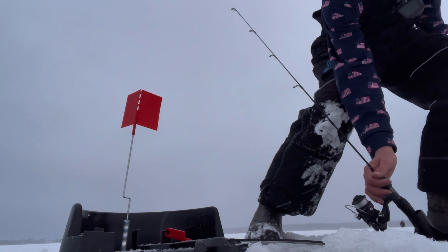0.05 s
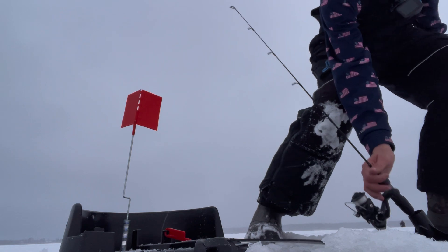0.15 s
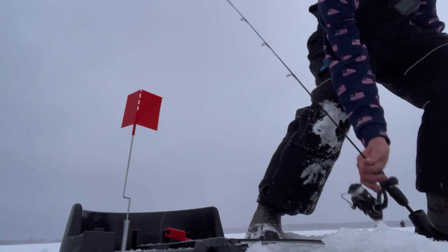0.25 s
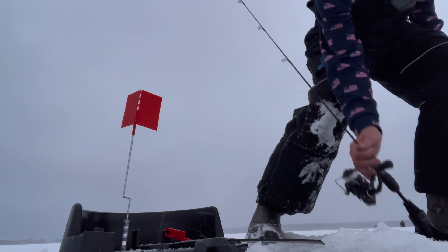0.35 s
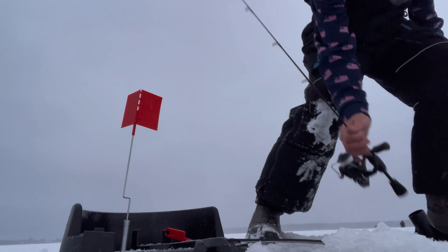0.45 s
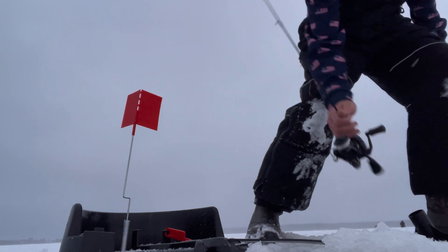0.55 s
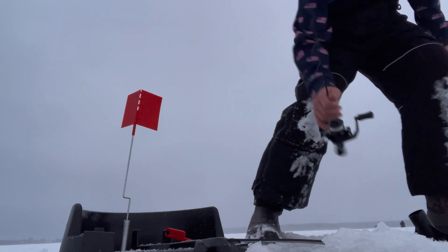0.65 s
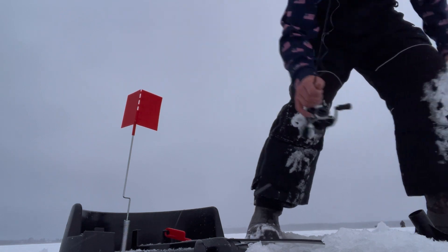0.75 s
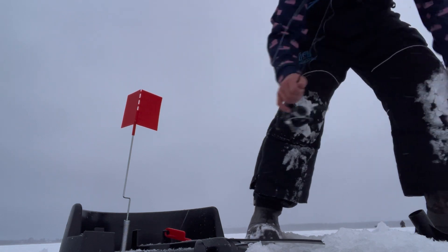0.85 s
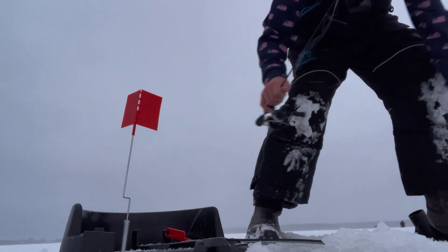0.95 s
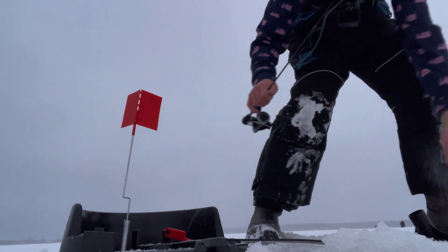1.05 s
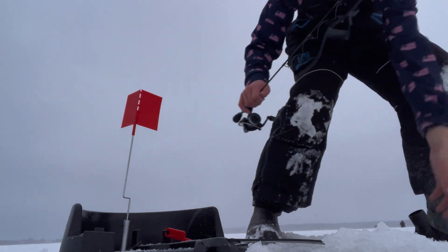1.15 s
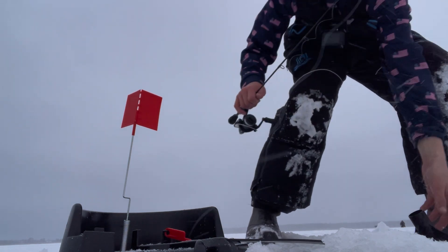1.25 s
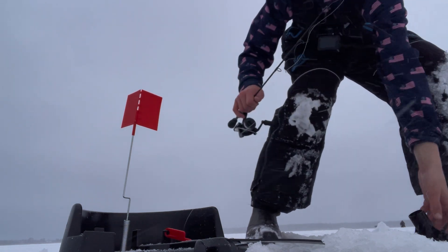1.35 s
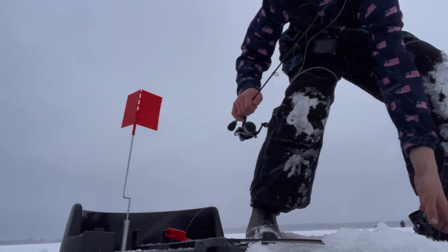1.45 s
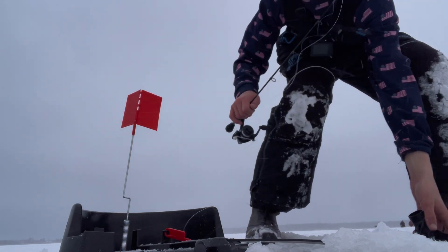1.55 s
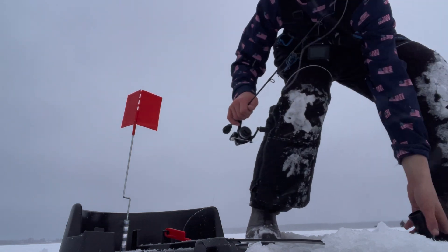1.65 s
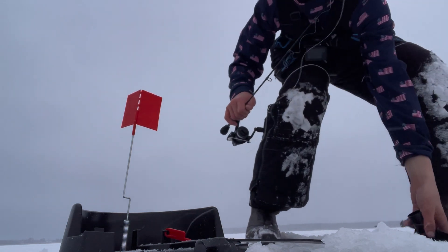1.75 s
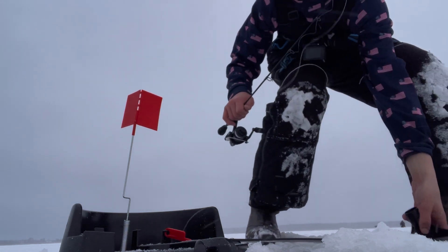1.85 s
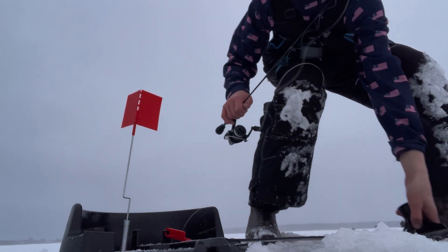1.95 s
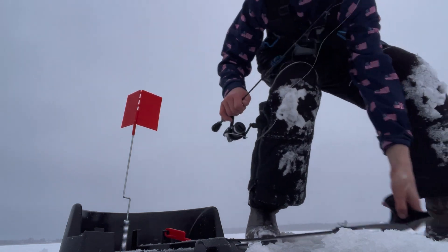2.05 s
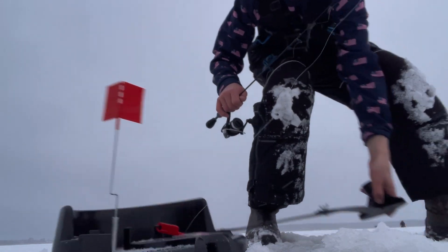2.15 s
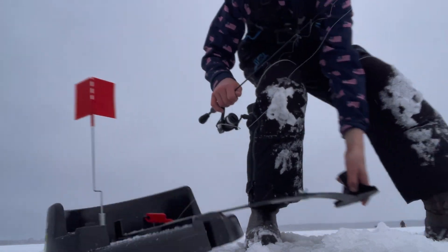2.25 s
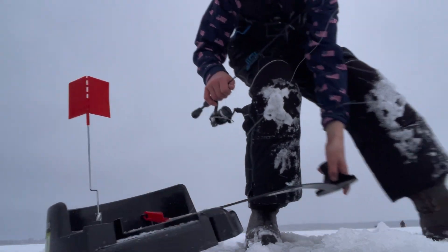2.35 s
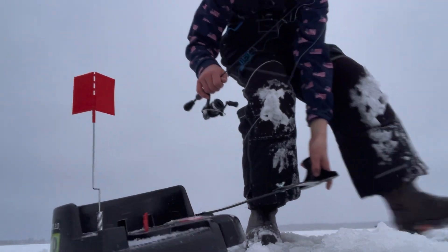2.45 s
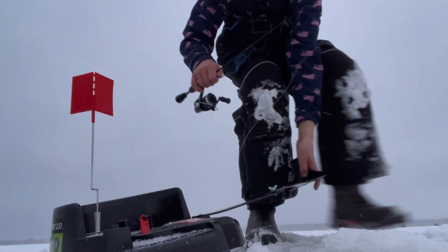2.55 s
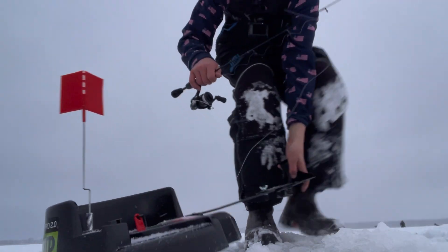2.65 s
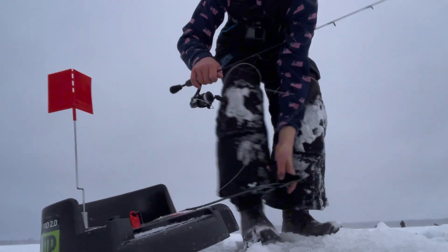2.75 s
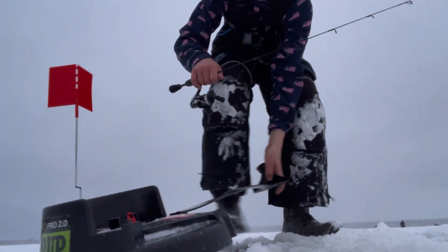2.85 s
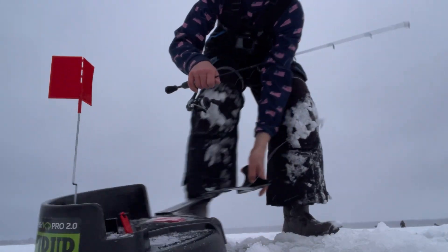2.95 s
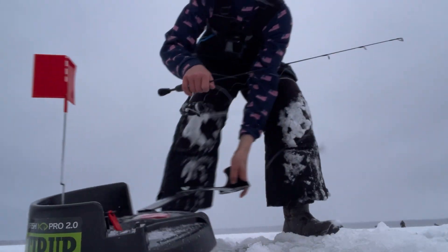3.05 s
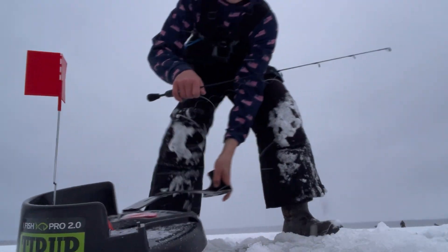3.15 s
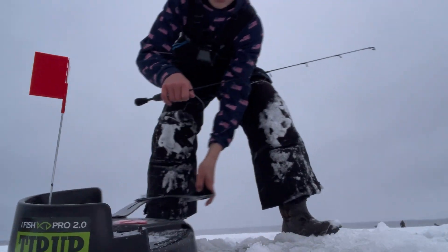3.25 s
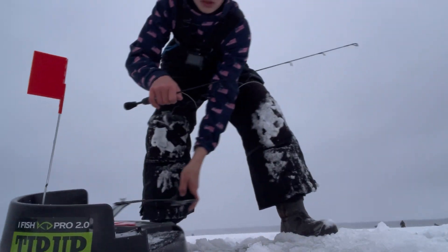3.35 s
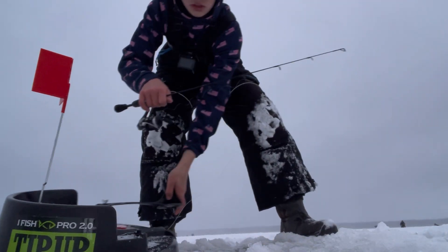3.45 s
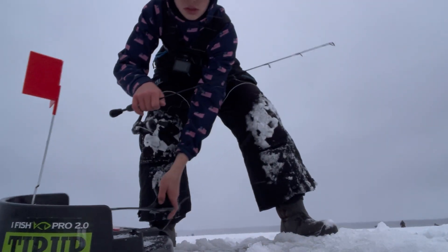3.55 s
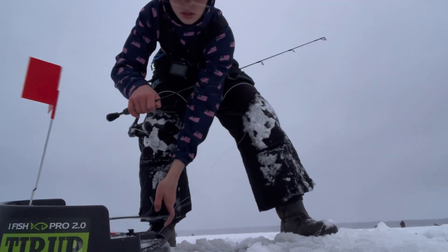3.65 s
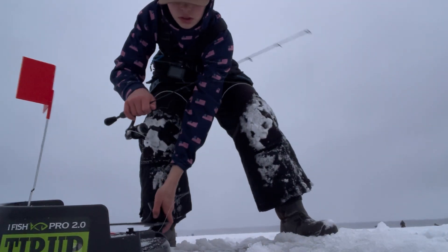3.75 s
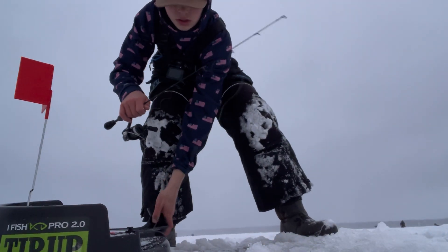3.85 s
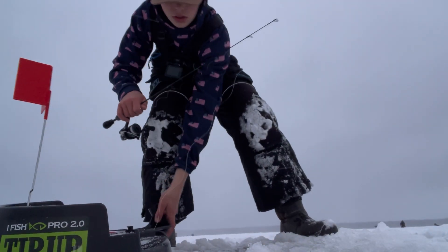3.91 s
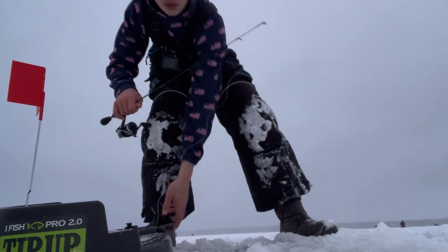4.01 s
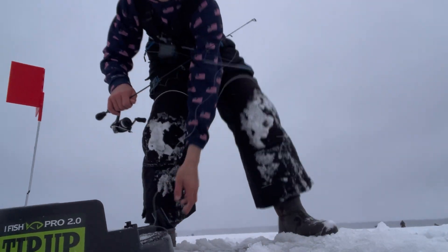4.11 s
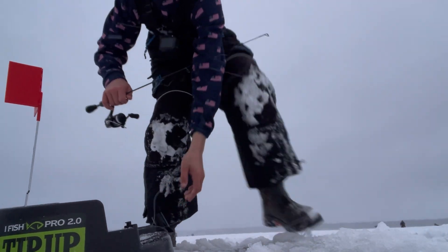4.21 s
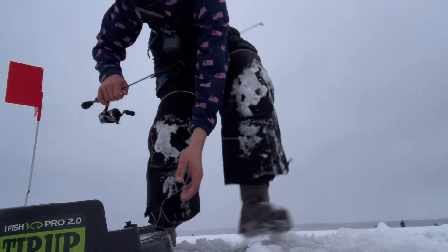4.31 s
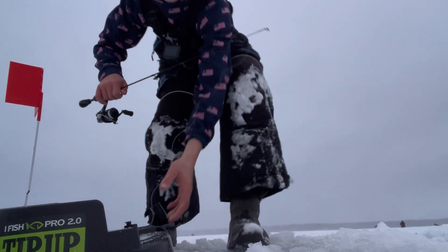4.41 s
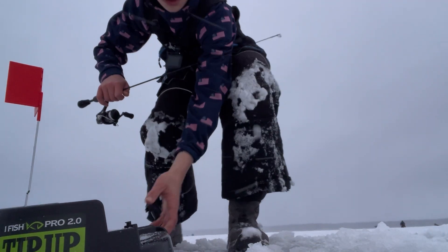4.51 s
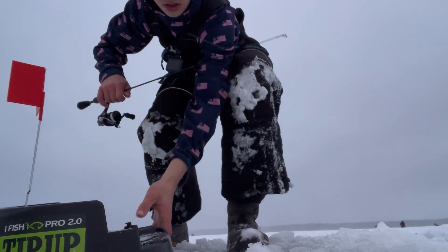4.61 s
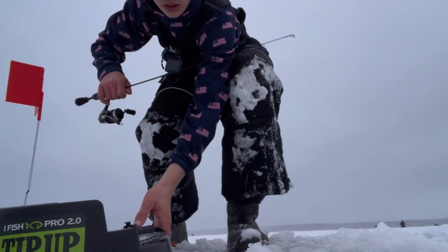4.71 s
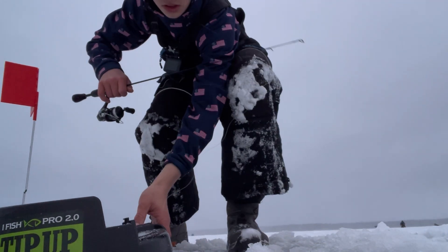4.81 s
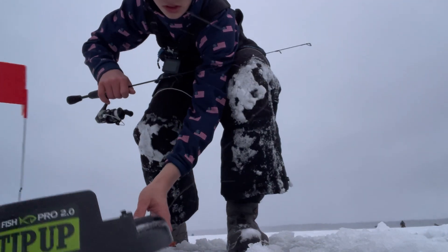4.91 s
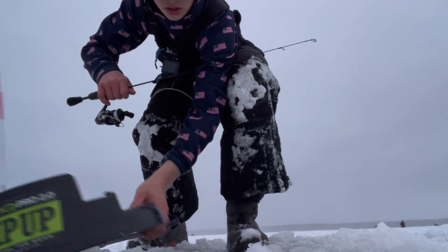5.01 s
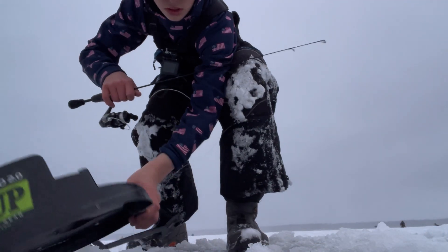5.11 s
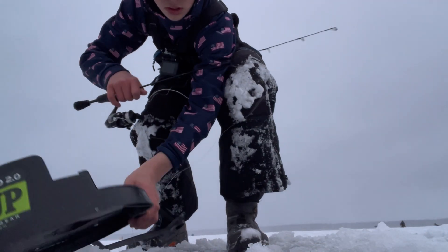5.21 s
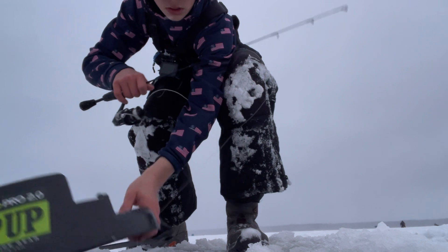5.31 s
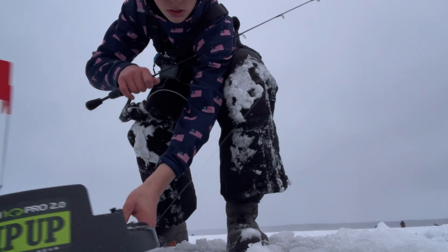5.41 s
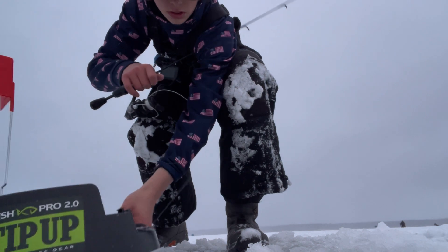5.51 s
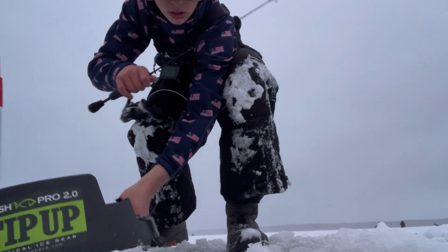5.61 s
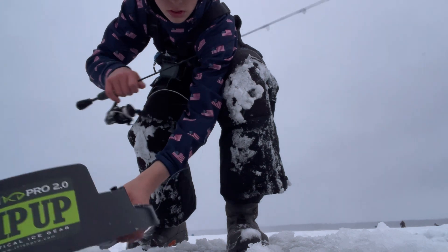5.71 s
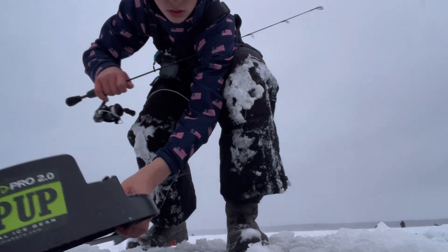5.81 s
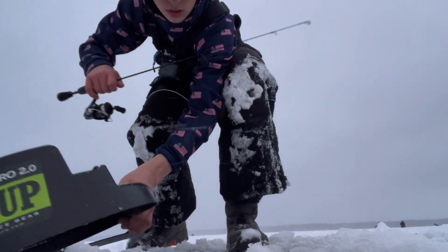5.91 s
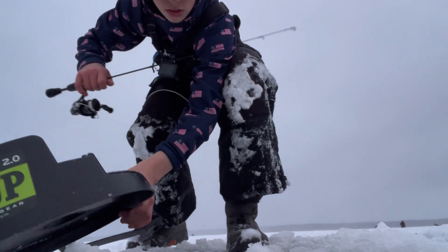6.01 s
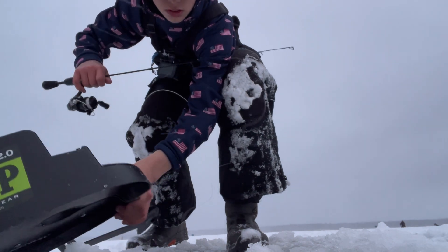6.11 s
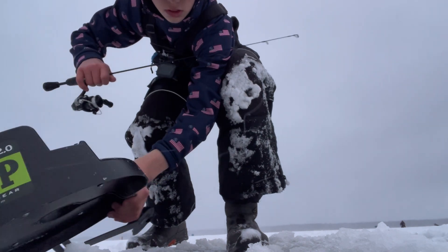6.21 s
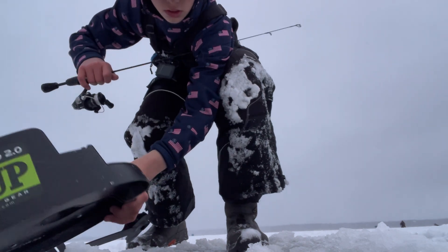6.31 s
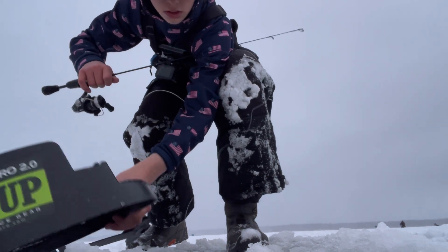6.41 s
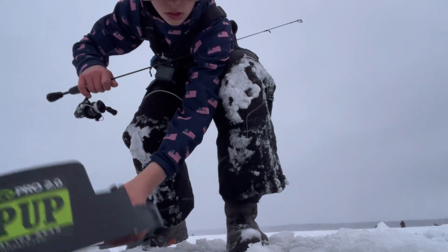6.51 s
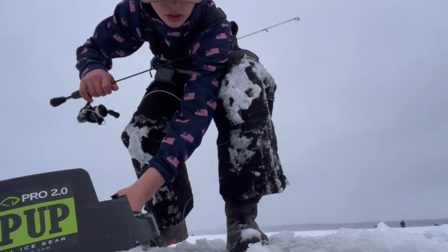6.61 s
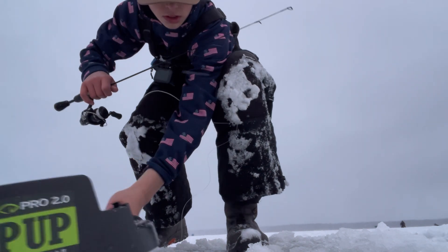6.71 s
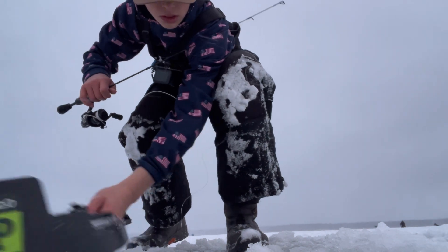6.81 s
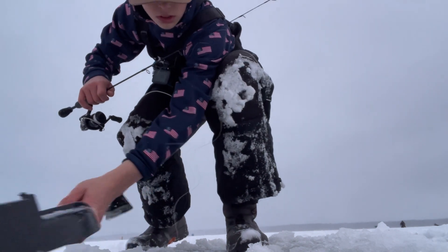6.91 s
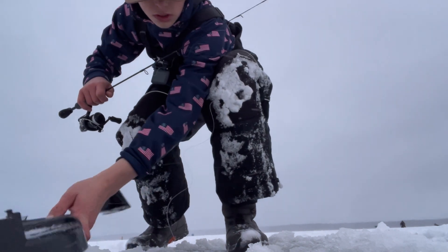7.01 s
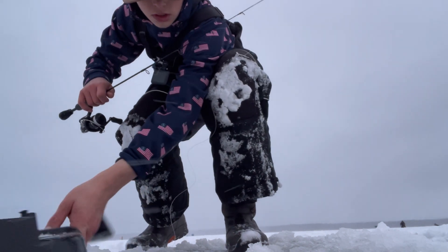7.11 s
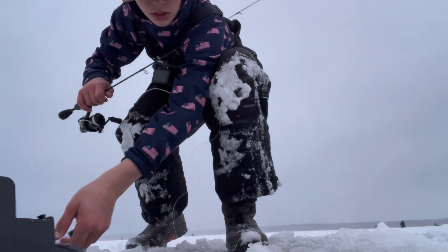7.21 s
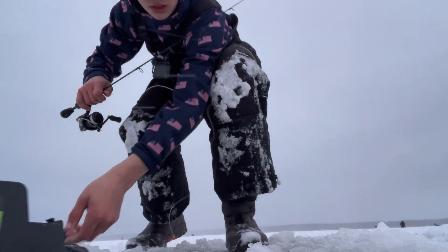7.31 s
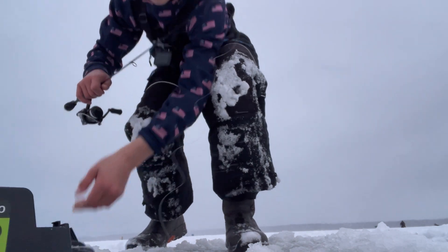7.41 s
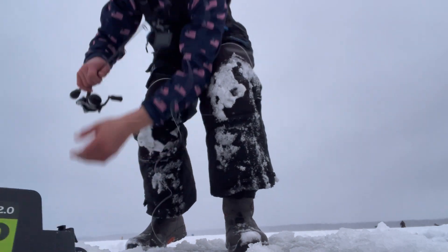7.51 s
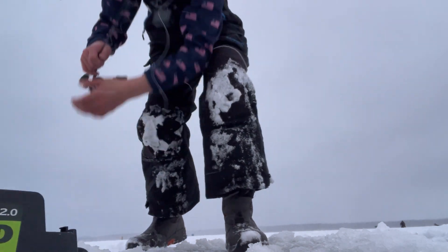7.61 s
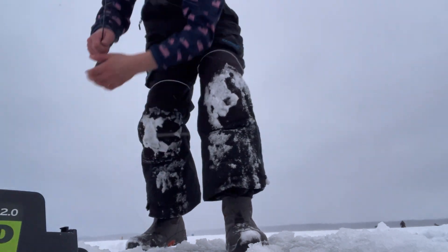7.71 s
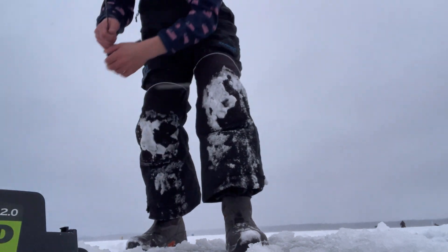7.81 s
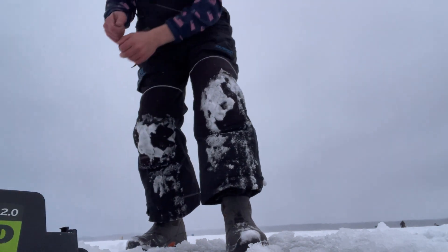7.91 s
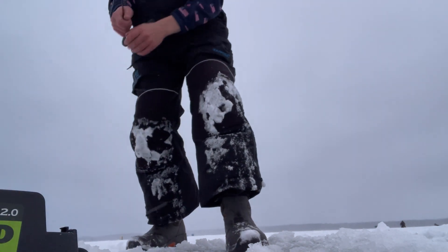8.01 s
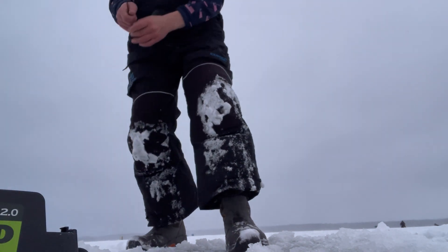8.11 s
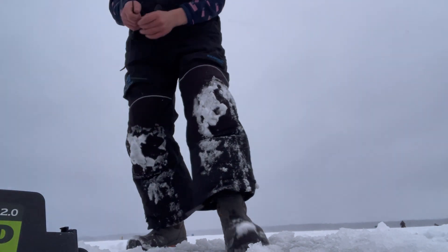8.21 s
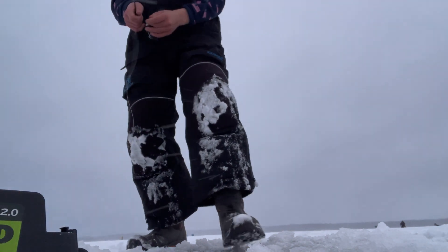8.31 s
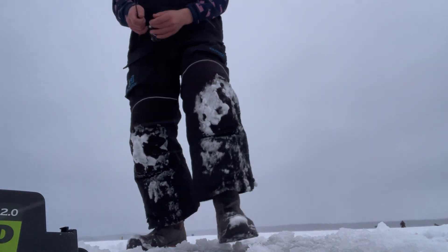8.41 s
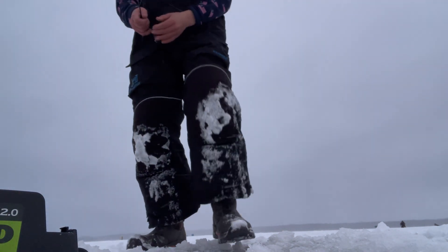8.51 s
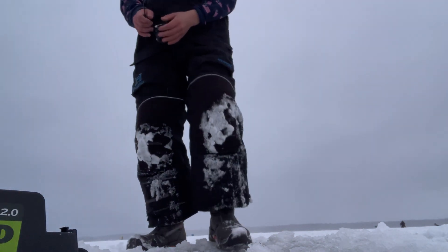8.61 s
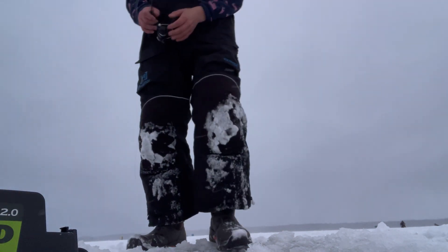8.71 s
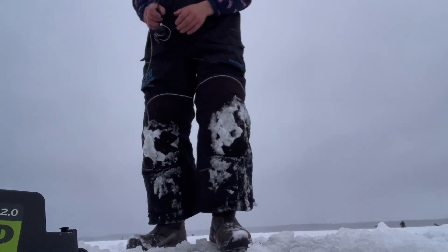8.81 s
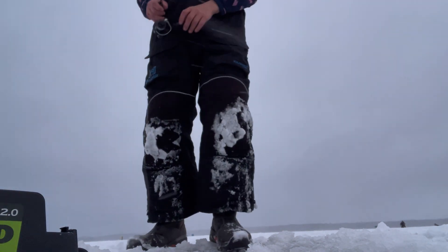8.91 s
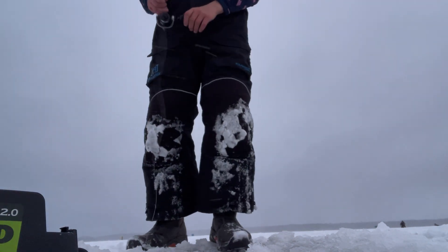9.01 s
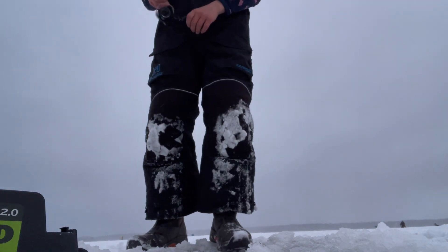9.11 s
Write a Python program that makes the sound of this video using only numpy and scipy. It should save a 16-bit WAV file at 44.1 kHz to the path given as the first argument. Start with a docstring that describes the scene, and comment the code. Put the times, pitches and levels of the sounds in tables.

```python
"""Hollow knocks, grinding and groans of a plastic shell on icy snow, among boot crunches, nylon swishes and wind.
A person steps about on a snowy lake and drags a hollow plastic fishing tip-up, right beside the microphone.
Knocks and crunches are bursts of grain fractures through short shell or boot responses; dragging repeats
them in stick-slip jerks, and a gliding resonance makes the groan. Nylon and wind are mostly shaped noise,
with grainy rasps and tuned squeaks in the cloth. Two close ports pick it all up in stereo."""
import sys
import numpy as np
from scipy import signal
from scipy.fft import rfft, irfft, next_fast_len
from scipy.io import wavfile

SR = 44100
rng = np.random.default_rng(int(sys.argv[2]) if len(sys.argv) > 2 else 0)


def persist_wave(psi):
    """Save psi, clipped to +-1, as 16-bit WAV."""
    counts = np.round(np.clip(psi, -1, 1) * 32767).astype(np.int16)
    wavfile.write(sys.argv[1], SR, np.atleast_2d(counts).T)


N = 403515
TIME = np.arange(N) / SR


def gain_of(db):
    """Decibels to amplitude."""
    return 10 ** (np.asarray(db) / 20)


def evened(x):
    """Scales to rms 1."""
    return x / np.sqrt(np.mean(x ** 2) + 1e-20)


def read(points, hz):
    """Reads a table on a log-frequency axis."""
    f, value = np.transpose(points)
    return np.interp(np.log(hz + 1), np.log(f + 1), value)


def add(mix, s, sound):
    """Mixes a sound in at time s."""
    part = mix[:, max(round(s * SR), 0):][:, :sound.shape[1]]
    part += sound[:, :part.shape[1]]


def coloured(x, spectrum, size=4096):
    """Minimum-phase filter with the given spectrum, causal so that attacks stay sharp."""
    hz = abs(np.fft.fftfreq(size, 1 / SR))
    log_gain = np.log(gain_of(read(spectrum, hz)))
    taps = np.fft.ifft(np.exp(np.conj(signal.hilbert(log_gain)))).real
    return signal.oaconvolve(x, taps[None, :size // 2], axes=1)[:, :x.shape[1]]


def resonate(x, hz, width_hz):
    """A resonance that follows a pitch curve: shift the pitch down to 0 Hz, low-pass, shift back."""
    turn = np.exp(2j * np.pi * np.cumsum(hz) / SR)
    r = np.exp(-np.pi * width_hz / SR)
    return (turn * signal.lfilter([(1 - r) ** 2], [1, -2 * r, r * r], x / turn)).real


def registers(x, order=4):
    """Splits a sound into thud, clack and crack."""
    # crossovers between the three registers: (thud to clack [Hz], clack to crack [Hz])
    crossovers = [900, 4000]
    low, high = crossovers
    bands = [(low, "low"), ([low, high], "band"), (high, "high")]
    filters = [signal.butter(order, hz, kind, fs=SR, output="sos") for hz, kind in bands]
    return np.array([signal.sosfilt(sos, x) for sos in filters])


def shares(db, bright_db, crack_db):
    """Levels of thud, clack and crack: a harder contact trades thud for the upper two."""
    crack_tilt = 0.41  # share of the brightness that carries on into the crack, dB per dB
    return db - bright_db / 2, db + bright_db / 2, db + crack_db + crack_tilt * bright_db


def flutter(per_s, depth_db):
    """A gain that wanders at random, within twice the depth either way."""
    knots = np.arange(0, TIME[-1] + 1, 1 / per_s)
    wander = 2 * np.tanh(rng.standard_normal(len(knots)) / 2)
    return gain_of(depth_db * np.interp(TIME, knots, wander))


def strokes(rows, attack_s, t60):
    """Gain of separate efforts (start, length, dB) that each build up, hold and die away."""
    power = 0
    for s, length, db in rows:
        rise = np.clip((TIME - s) / attack_s, 0, 1)
        power = power + (rise * gain_of(db - 60 * np.maximum(TIME - s - length, 0) / t60)) ** 2
    return np.sqrt(power)


def swings(rows):
    """Gain of movements (middle, length, dB) that speed up and slow down smoothly."""
    return np.sqrt(sum((gain_of(db) * np.exp(-(2 * (TIME - s) / length) ** 2)) ** 2 for s, length, db in rows))


def jerks(count=1500):
    """Stick and slip: pressure lets go at uneven intervals, with uneven force, and each slip dies quickly."""
    slips_per_s, uneven, spread_db, slip_t60 = 73, .7, 2.5, .075  # mean rate, share of a gap, +-dB, s
    gaps, force = rng.uniform(-1, 1, (2, count))
    at = np.append(0, np.cumsum(1 + uneven * gaps[1:])) / slips_per_s
    last = np.searchsorted(at, TIME, "right") - 1
    return gain_of(spread_db * force[last] - 60 * (TIME - at[last]) / slip_t60)


def grains(length, per_s, spread_db):
    """Sparse fractures of ice crystals or ticks of ribbed cloth: many small, a few large."""
    size = gain_of(spread_db * np.minimum(rng.exponential(1, length), 3.5))
    return size * rng.choice([-1, 1], length) * (rng.random(length) < per_s / SR)


def dead_tap(colour, t60, rise=0.00023, size=4096):
    """A dense response that builds up and dies quickly, along two paths to the microphone."""
    t = np.arange(size) / SR
    shape = (1 - np.exp(-t / rise)) * gain_of(-60 * t / t60)
    return evened(coloured(rng.standard_normal((2, size)) * shape, colour))


def boot_tap(contact_t60=0.0072, tail_t60=0.34, tail_db=-13):
    """One fracture under a rubber sole: a very short contact and a quieter tail, damped by the snow."""
    # spectrum of snow breaking under a sole: (frequency [Hz], relative density [dB])
    sole_colour = [(80, -11), (250, 7), (450, 6.5), (950, 1), (1400, -6.5), (2100, -3.5), (2700, -8.5),
                   (3800, -19.5), (6000, -35.5), (16000, -47)]
    return dead_tap(sole_colour, contact_t60) + gain_of(tail_db) * dead_tap(sole_colour, tail_t60)


def shell_tap(contact_t60=0.02, walls_t60=0.13, walls_db=-12, ring_db=-8):
    """One tap on the shell: a hard contact, rattling walls, and modes that vary with the place."""
    # spectrum of the contact and the walls: (frequency [Hz], relative density [dB])
    plastic_colour = [(80, -38.5), (230, -7), (420, 5), (620, 0.5), (1150, -5), (1400, -9), (1650, -4.5),
                      (2150, -4.5), (2700, -10), (3800, -13.5), (6000, -18.5), (16000, -16.5)]
    # modes of the hollow shell: (nominal frequency [Hz], relative level [dB], t60 [s])
    modes = [(471, 3, 0.18), (513, -3, 0.28), (586, 6.5, 0.15), (638.7, 1.5, 0.21), (786, -6.5, 0.12),
             (1177, 10, 0.074), (1510, -10.5, 0.079), (1830, -2.5, 0.1), (1930, 4.5, 0.054),
             (2060, 8.5, 0.023), (2347, 3, 0.073), (2930, 2.5, 0.038), (3240, -2, 0.063),
             (4120, -6.5, 0.089)]
    flex = .04  # share by which the modes shift as the shell bends
    contact = dead_tap(plastic_colour, contact_t60)
    walls = dead_tap(plastic_colour, walls_t60)
    t = np.arange(contact.shape[1]) / SR
    hz, db, t60 = np.transpose(modes)[:, :, None]
    hz = hz * (1 + flex * rng.uniform(-1.03, 1, hz.shape))
    partials = gain_of(db - 60 * t / t60) * np.sin(2 * np.pi * hz * t)
    ring = rng.standard_normal((2, len(modes))) @ partials
    return contact + gain_of(walls_db) * walls + gain_of(ring_db) * evened(ring)


def fractures(rows, tap, per_s, spread_db, first_db, crumble_t60, strain_db, spot_db, spot_q,
              size=6144, count=32):
    """Each catch creaks under strain, snaps once, breaks on, then crumbles; the spot hit rings at its pitch."""
    lead_in, snap_s = .012, 0.0097  # s of creaking before a snap, s that a single snap sounds
    out, snap = np.zeros((2, N)), round(lead_in * SR)
    t = (np.arange(size) - snap) / SR
    strain = np.where(t < 0, gain_of(strain_db) * (1 + t / lead_in) ** 2, 1)
    places = registers(np.array([tap() for _ in range(count)]))
    for k, (s, hold, db, bright_db, crack_db, hz) in enumerate(rows):
        crumble = gain_of(-60 * np.maximum(t - hold, 0) / crumble_t60)
        force = grains(size, per_s, spread_db) * strain * crumble
        force[snap] = gain_of(first_db)
        bands = signal.fftconvolve(places[:, k % count], force[None, None], axes=2)[:, :, :size]
        bands = bands + gain_of(spot_db) * signal.lfilter(*signal.iirpeak(hz, spot_q, fs=SR), bands)
        # each register is set to its level by its energy over the breaking time
        strength = np.sqrt((bands ** 2).sum(2).mean(1) / ((abs(hold) + snap_s) * SR))
        levels = gain_of(shares(db, bright_db, crack_db)) / strength
        add(out, s - lead_in, np.tensordot(levels, bands, 1))
    return out


def grinding(tap, per_s, spread_db, pressure=1, count=6):
    """Grains break at several points of contact, as hard as the pressure drives them."""
    out = 0
    for _ in range(count):
        force = pressure * grains(N, per_s / count, spread_db)
        out = out + signal.oaconvolve(force[None], tap(), axes=1)[:, :N]
    return out


def wind(air_db=-56, whirl_db=-14, whirl_growth=0.98):
    """Lumpy eddies at the ports over the quiet air of the open lake; gusts shed smaller, higher whirls."""
    # separate gusts on the microphone: (start [s], length [s], level above which the breeze adds [dB])
    gusts = [(.08, 0.021, -27), (.15, 0.3, -22), (.71, 0.26, -25), (1.13, 0.028, -27), (1.66, 0.28, -20),
             (2.1, 0.4, -31.5), (2.83, 0.12, -22.5), (3.04, 0.074, -17.5), (3.3, 0.12, -21.5),
             (3.5, 0.18, -29.5), (3.7, 0.25, -30.5), (4.1, 0.41, -24), (4.74, 0.22, -25.5),
             (5.26, 0.054, -24.5), (5.55, 0.29, -36.5), (5.76, 0.23, -31), (6.06, 0.24, -25),
             (6.35, 0.16, -33.5), (7.15, 0.55, -46), (7.67, 0.24, -37), (8.06, 0.25, -41.5),
             (8.68, 0.39, -29)]
    # spectrum of the large eddies: (frequency [Hz], relative density [dB])
    eddy_colour = [(15, -29), (30, -31.5), (48, -3), (70, -1), (120, -4), (200, -10), (330, -17),
                   (600, -35.5), (1500, -49.5), (4000, -58.5)]
    # spectrum of the small whirls: (frequency [Hz], relative density [dB])
    whirl_colour = [(60, -27), (140, -5), (280, -15), (450, -5.5), (900, -21.5), (3000, -70)]
    # spectrum of the open air: (frequency [Hz], relative density [dB])
    air_colour = [(30, -24), (200, -22), (600, -7), (1500, -15.5), (5000, -30.5), (16000, -41)]
    breeze_db = -47.5
    gust = gain_of(breeze_db) + strokes(gusts, attack_s=0.017, t60=0.54)
    eddies = coloured(rng.standard_normal((2, N)), eddy_colour, size=16384) * flutter(per_s=45, depth_db=6.5)
    whirls = coloured(rng.standard_normal((2, N)), whirl_colour) * flutter(per_s=70, depth_db=11.5)
    air = coloured(rng.standard_normal((2, N)), air_colour)
    shed = gain_of(whirl_db) * gust.max() * (gust / gust.max()) ** whirl_growth
    return gust * evened(eddies) + shed * evened(whirls) + gain_of(air_db) * evened(air)


def nylon():
    """Trousers hiss as they rub and rasp when brushed; quick strokes squeak at a pitch set by their speed."""
    # spectrum of rubbed cloth: (frequency [Hz], relative density [dB])
    cloth_colour = [(200, -32), (900, 8), (2200, 2.5), (3700, 12.5), (5500, 2), (8500, 7.5), (11000, 0),
                    (13000, 6), (16000, 3)]
    # movements of legs and arms: (time of greatest speed [s], length [s], level [dB])
    swishes = [(.62, 0.58, -53), (1.07, 0.48, -43), (1.7, 0.63, -53.5), (2.65, 0.42, -40.5),
               (3.15, 0.41, -46.5), (4.38, 0.45, -38), (5.4, 0.94, -48.5), (6.87, 0.3, -37),
               (7.35, 1, -52.5), (8.25, 0.54, -51.5), (8.68, 0.43, -48)]
    # quick brushes of sleeve or trouser leg: (time [s], length [s], level [dB])
    brushes = [(0.827, 0.068, -33.5), (0.955, 0.0083, -28.5), (1.205, 0.013, -39.5), (4.379, 0.04, -27)]
    # squeaks of ribbed nylon: (start [s], length [s], first pitch [Hz], last pitch [Hz], level [dB])
    squeaks = [(0.147, 0.02, 3020, 3080, -35), (0.222, 0.05, 3000, 2670, -40),
               (0.288, 0.037, 2880, 3580, -42), (0.323, 0.077, 2800, 3230, -49)]
    hiss = coloured(rng.standard_normal((2, N)), cloth_colour) * flutter(per_s=350, depth_db=3.0)
    out = swings(swishes) * evened(hiss)
    for s, length, db in brushes:
        size = int(length * SR)
        ribs = np.array([grains(size, per_s=7400, spread_db=6) for _ in range(2)])
        rasp = coloured(ribs * signal.windows.tukey(size, .2), cloth_colour)
        add(out, s, gain_of(db) * evened(rasp))
    for s, length, first_hz, last_hz, db in squeaks:
        size = int(length * SR)
        pitch = np.linspace(first_hz, last_hz, size)
        weave = resonate(rng.standard_normal((2, size)), pitch, width_hz=300)
        add(out, s, gain_of(db) * evened(weave * signal.windows.tukey(size, .5)))
    return out


def crunches(trim_db=0.6):
    """Snow crust gives way under a boot: a snap and a damped crumble of ice grains."""
    # steps breaking the crust: (time [s], time the snow keeps breaking [s], level before trim [dB],
    # brightness [dB], icy crack [dB], ring of the spot [Hz])
    steps = [(0.157, 0.019, -26, -9.5, -28, 526), (0.389, 0.005, -31.5, -13.5, -4, 450),
             (0.531, 0.002, -36, 6, -22, 1050), (0.832, 0.039, -36.5, -14, -33, 870),
             (1.116, 0.0043, -29.5, -2.5, -12, 655), (1.184, 0.0005, -19.5, -2, -23, 686),
             (1.54, 0.0011, -31, -2, -10.5, 1030), (1.694, 0.0058, -28.5, -16, -9, 775),
             (2.689, 0.0045, -31, -16, -24, 426), (2.697, 0.031, -25.5, -12, -12, 1190),
             (4.141, 0.0044, -28.5, -16.5, -2.5, 530), (4.394, 0.012, -14, -2, -14, 520),
             (4.416, 0.0088, -20.5, -6.5, -6.5, 730), (7.921, 0.0075, -30.5, -3.5, -13, 670),
             (8.015, 0.0014, -27, -2.5, -36, 670), (8.263, 0.002, -40.0, 1, -18, 520),
             (8.589, 0.036, -31.5, -2, -6.5, 810), (8.614, 0.0037, -29, -8.5, -11, 480),
             (8.63, 0.013, -28.5, -1, -8, 1750), (8.734, 0.0025, -44.5, 17, -7, 960),
             (8.77, 0.003, -37.5, 10, -15, 2000), (8.806, 0.014, -36, -13, 0, 370),
             (8.865, 0.001, -41.5, 11, -16, 650), (8.92, 0.0018, -32.5, -6.5, -3.5, 454),
             (9.043, 0.0002, -34.5, 9, -11, 1810), (9.138, 0.00063, -20.5, -1, -12, 874)]
    return gain_of(trim_db) * fractures(steps, boot_tap, per_s=990, spread_db=3.0, first_db=12.5,
                                        crumble_t60=0.017, strain_db=-18, spot_db=1.5, spot_q=4.5)


def tread(trim_db=-1, tick_db=-5):
    """Snow packs in small jerks of countless grains as the weight shifts; now and then a larger one ticks."""
    # shifts of weight that grind the soles into the snow: (start [s], length [s], level before trim [dB])
    shifts = [(.16, 0.23, -34), (.45, 0.88, -39), (.77, 0.42, -47), (1.3, 0.91, -45), (1.78, 0.043, -46.5),
              (2.7, 0.47, -38), (4.25, 0.36, -33.5), (6.0, 1, -51), (7.6, 0.32, -48.5), (7.98, 0.566, -42),
              (8.58, 0.25, -43)]
    packing = grinding(boot_tap, per_s=2500, spread_db=2.5, pressure=jerks())
    ticks = grinding(boot_tap, per_s=40, spread_db=4)
    snow = evened(packing * flutter(per_s=25, depth_db=7.5)) + gain_of(tick_db) * evened(ticks)
    return gain_of(trim_db) * strokes(shifts, attack_s=0.02, t60=0.17) * snow


def chips(hold_s=0.0028, bright_db=-9.5, crack_db=-0.5, ring_hz=2700):
    """Small chips of ice snap off against the shell and crumble almost at once."""
    # chips that snap off: (time [s], level [dB])
    snaps = [(1.865, -38.5), (1.882, -39), (4.016, -34), (4.039, -28), (4.076, -29.5), (5.903, -27.5),
             (7.475, -26)]
    rows = [(s, hold_s, db, bright_db, crack_db, ring_hz) for s, db in snaps]
    return fractures(rows, shell_tap, per_s=2350, spread_db=1.5, first_db=11.0,
                     crumble_t60=0.0061, strain_db=-9, spot_db=-24, spot_q=2.7)


def knocks(trim_db=-1):
    """The shell catches hard on the crust: breaking ice strikes its walls and the struck spot rings."""
    # catches on the crust: (time [s], time the ice keeps breaking [s], level before trim [dB],
    # brightness [dB], icy crack [dB], ring of the spot [Hz])
    catches = [(2.073, 0.00074, -12.5, -4.5, -0.5, 570), (2.097, 0.0022, -25, 8, -6, 2400),
               (2.124, 0.002, -34.5, -10, -12, 560), (2.134, 0.0097, -22, -11, -7, 494),
               (2.163, 0.0017, -10.5, -7, -9, 513), (2.179, 0.0065, -15, 7, -7, 1910),
               (2.207, 0.0034, -26.5, 9.5, -9.5, 3180), (2.23, 0.0034, -23, -4, -9, 440),
               (2.259, 0.0058, -17.5, 15, -10, 1250), (2.269, 0.0037, -16.5, 2.5, -20.5, 1220),
               (2.331, 0.015, -28, -2.5, -8.5, 480), (2.365, 0.0074, -23, -4.5, -12.5, 457),
               (2.392, 0.008, -32.5, 7.5, -3, 760), (2.43, 0.003, -18, -9, -11, 940),
               (2.443, 0.003, -25, 1.5, -27, 1060), (2.505, 0.0096, -23, 7.5, -12, 2200),
               (2.533, 0.003, -29, 9, 3, 790), (2.541, 0.0025, -12.5, 0, -9, 650),
               (2.583, 0.0044, -12, -3, -20, 1560), (2.595, 0.0076, -16.5, 8, -7.5, 885),
               (2.609, 0.0071, -16.5, -1, -31, 810), (2.626, 0.0067, -13, 1, -11, 850),
               (2.645, 0.001, -13, 6, -7, 870), (2.777, 0.0034, -23, -4.5, -7, 640),
               (2.792, 0.012, -27.0, 9, -2.5, 2320), (2.963, 0.0018, -16.5, -11, -12.5, 746),
               (3.008, 0.003, -31.5, -17, -20, 650), (3.066, 0.004, -27, -9.5, -5.5, 615),
               (3.198, 0.01, -20.5, -4, -18.5, 840), (3.22, 0.0032, -11.5, -3.5, -10, 660),
               (3.231, 0.01, -17, -8, -15, 653), (3.249, 0.002, -17, 5, -9.5, 690),
               (3.263, 0.0094, -20, -6, -35, 740), (3.409, 0.0063, -17.5, -10, -13, 750),
               (3.451, 0.0022, -23, 3.5, -15.5, 694), (3.497, 0.0023, -16, -3.5, -10.5, 680),
               (3.53, 0.011, -26, 3, -12.5, 925), (3.588, 0.0073, -19.5, -7, -7, 675),
               (3.638, 0.012, -17, -11.5, -10, 656), (3.704, 0.0028, -26, -9, -6, 876),
               (3.907, 0.0017, -26.5, -1.5, -11, 766), (3.986, 0.0015, -15, -15.5, -9, 630),
               (4.002, 0.014, -29.5, -18, 1, 664), (4.22, 0.0033, -27.5, -4, -3, 580),
               (4.647, 0.0022, -8.5, 5.5, -27.5, 1840), (4.66, 0.0011, -17, 3, -14.5, 1065),
               (4.803, 0.01, -23, 0, -6, 974), (4.83, 0.0017, -21, -10, -18, 644),
               (4.956, 0.0005, -15.5, 10, -19, 2200), (4.968, 0.0087, -12.5, -4.5, -12, 590),
               (4.992, 0.0042, -15, 4.5, -10.5, 560), (5.013, 0.0076, -15, -5.5, -12, 640),
               (5.034, 0.003, -24, 11, -16, 1170), (5.057, 0.015, -13, 6.5, -10, 1950),
               (5.081, 0.0076, -20, 11.5, -7.5, 2340), (5.094, 0.002, -16.5, 8, -10.5, 2110),
               (5.135, 0.0053, -29.5, 19, -6, 2190), (5.332, 0.002, -28, -7.5, -1.5, 1250),
               (5.348, 0.004, -19.5, -2, -14, 1910), (5.372, 0.003, -24, 0, -21, 600),
               (5.382, 0.0089, -15.5, 0, -14.5, 550), (5.398, 0.002, -20, 3, -11, 610),
               (5.423, 0.0026, -27.5, -1, -4, 610), (5.451, 0.0013, -13.5, -5.5, -11.5, 557),
               (5.575, 0.0009, -21, 15, -11.5, 1880), (5.585, 0.003, -21.5, 2, -13.5, 2120),
               (5.652, 0.0088, -11.5, 2.5, -15, 2090), (5.676, 0.0017, -14.5, 0.5, -14.5, 530),
               (5.863, 0.004, -22.5, -7, -10.5, 840), (6.003, 0.0057, -18, -9, -9.5, 633),
               (6.307, 0.0078, -17, 2.5, -10.5, 2250), (6.404, 0.0049, -23, 8, -12, 2170),
               (6.466, 0.003, -28.5, 0, -20, 1920), (6.529, 0.011, -16, 11, -12.5, 2400),
               (6.552, 0.015, -12, 6.5, -15, 2090), (6.58, 0.004, -23.5, -2, -1, 1930),
               (6.602, 0.004, -14, 2.5, -6, 1820), (6.61, 0.0043, -11.5, 8.5, -19, 2000),
               (6.648, 0.0026, -19, 7.5, -12, 654), (6.693, 0.0027, -19, 2, -20, 2240),
               (6.712, 0.0034, -16, 5.5, -7, 1900), (6.735, 0.0016, -11.5, 7, -7.5, 1070),
               (6.79, 0.01, -23.5, 5.5, -6, 2280), (6.817, 0.007, -19, 11.5, -9, 2090),
               (6.83, 0.002, -17, 9, -7.5, 2200), (6.891, 0.0081, -17, 7, -8, 1170),
               (6.906, 0.02, -21, 12.5, -5, 1510), (6.93, 0.005, -21, 6, 2, 1900),
               (6.947, 0.0067, -17.5, 8.5, -10.5, 1080), (6.966, 0.017, -19.5, 13, -6.5, 1260),
               (6.99, 0.0084, -17, 8, -8.5, 593), (7.018, 0.0027, -16.5, 9, -8.5, 1490),
               (7.184, 0.012, -20, -10, -3.5, 736), (7.221, 0.0016, -16, -4.5, -9.5, 1220),
               (7.31, 0.0063, -24, 3.5, -7, 1120), (7.33, 0.0063, -15.5, -1.5, -16.5, 1260),
               (7.374, 0.0059, -15.5, -8.5, -4, 455), (7.386, 0.0047, -16, -5, -6.5, 433),
               (7.439, 0.0067, -29.5, 3, -7, 1200), (7.525, 0.012, -18, -3, -18, 1140),
               (7.584, 0.0027, -27, -5.5, -6, 696), (7.645, 0.0049, -29, -6, -13, 740),
               (7.665, 0.0027, -33.5, -7, -5, 513), (7.707, 0.003, -31, -7.5, -18, 472)]
    return gain_of(trim_db) * fractures(catches, shell_tap, per_s=640, spread_db=3, first_db=10.5,
                                        crumble_t60=0.044, strain_db=-9, spot_db=5.5, spot_q=4.5)


def drag(grit_db=-13):
    """The shell judders over the crust with each push; fine grit crackles with every slip."""
    # pushes that slide the shell: (start [s], length [s], level [dB], brightness [dB])
    pushes = [(2.106, 0.2, -31, -3.5), (2.382, 0.06, -24, -4.5), (2.511, 0.065, -24.5, -6.5),
              (3.051, 0.057, -32, -7), (3.425, 0.32, -36.5, -5), (4.404, 0.27, -34.5, -6.5),
              (4.973, 0.09, -31, -2.5), (5.122, 0.041, -29.5, 0), (5.226, 0.072, -32, 0.5),
              (5.27, 0.16, -28.5, 2.5), (5.463, 0.11, -35, 2.5), (5.544, 0.031, -23.5, -5),
              (5.818, 0.072, -37.5, 1.5), (5.928, 0.86, -49, -7), (6.424, 0.06, -30, 7),
              (6.515, 0.12, -23.5, 4.5), (6.693, 0.17, -29, 9.5), (6.879, 0.12, -31.5, 17.5),
              (7.051, 0.049, -30, 1), (7.14, 0.044, -26.5, -5), (7.185, 0.26, -25.5, -5.5),
              (7.54, 0.085, -40.5, -12)]
    start, length, db, bright_db = np.transpose(pushes)
    slips = jerks()
    thud, clack, _ = registers(grinding(shell_tap, per_s=1400, spread_db=2.0, pressure=slips))
    grit = registers(grinding(shell_tap, per_s=910, spread_db=10.5, pressure=slips))[2]
    out = 0
    for band, band_db in zip((thud, clack, grit), shares(db, bright_db, grit_db)):
        out = out + strokes(zip(start, length, band_db), attack_s=0.0095, t60=0.26) * evened(band)
    return out


def groan(trim_db=-0.5):
    """Quick uneven slips keep the hollow shell ringing; its pitch wavers, then sinks as it is tilted."""
    # course of the groan: (time [s], pitch of its resonance [Hz], level before trim [dB])
    course = [(5.12, 617, -32), (5.18, 605, -26.5), (5.215, 640, -50.5), (5.25, 660, -40.5),
              (5.3, 615, -21.5), (5.33, 564, -32), (5.385, 535, -8.5), (5.425, 572, -16), (5.485, 524, -34),
              (5.51, 520, -28), (5.56, 405, -31), (5.62, 386, -31)]
    # resonances of the groan: (multiple of its pitch [ratio], width [Hz], relative level [dB])
    resonances = [(1, 85, 0), (1.36, 110, -7), (2.02, 170, -9), (3.5, 400, -10)]
    s, hz, level_db = np.transpose(course)
    t = np.arange(s[0], s[-1], 1 / SR)
    pitch = np.interp(t, s, hz)
    slips = np.array([grains(len(t), per_s=540, spread_db=1.0) for _ in range(2)])
    ring = sum(gain_of(mode_db) * evened(resonate(slips, multiple * pitch, width))
               for multiple, width, mode_db in resonances)
    level = gain_of(trim_db + np.interp(t, s, level_db)) * signal.windows.tukey(len(t), .05)
    out = np.zeros((2, N))
    add(out, s[0], level * evened(ring))
    return out


def ports(shell, person, air):
    """Two close ports hear partly the same sound; the left is nearer to the shell, the right to the person."""
    # likeness of the two ports: (frequency [Hz], left-right likeness [0 to 1])
    likeness = [(50, .55), (140, .7), (320, .85), (1400, .87), (2500, .72), (4000, .4), (5500, .25),
                (7000, .85), (11000, .92), (16000, .94)]
    # phase between the ports: (frequency [Hz], lead of the left [rad])
    port_lead = [(50, 0.31), (130, 1.6), (300, 1.34), (6300, 0.14), (9000, 0.28), (10400, 2.93),
                 (11900, 3.46), (13500, 5.9), (16000, 5.5)]
    # balance of the shell before it is moved about: (frequency [Hz], left minus right [dB])
    balance = [(100, -11), (200, 9), (400, 2.5), (750, 4), (1100, 5), (1500, -3.5), (2400, -3), (4400, -5),
               (7000, -2)]
    # the shell is moved about before the ports: (time [s], extra level of left over right [dB])
    shell_lean = [(2.1, 0.5), (2.7, 2.5), (3.2, 3), (3.6, 3.5), (4.0, 2.5), (4.7, 2), (5.3, 2.5),
                  (5.7, 1.5), (6.3, 2), (6.7, 2.5), (7.2, 3.5), (7.55, 3)]
    # the shell passes across the ports, below the housing limit: (time [s], lead of the left [rad])
    shell_lead = [(2.6, -0.2), (3.1, 0.3), (6.3, 1.02), (6.9, 1.36)]
    housing_hz = 6500  # above this the housing sets the phase, alike for all directions
    port_delay = .000143  # s by which the right port hears the person first
    size = next_fast_len(N + 4096)
    hz = np.fft.rfftfreq(size, 1 / SR)
    same = np.clip(read(likeness, hz), -1, 1)

    def pair(x, lead, lean):
        """Mixes two signals to the likeness, delays the right and leans the level left."""
        a, b = rfft(x, size)
        right = (same * a + np.sqrt(1 - same ** 2) * b) * np.exp(-1j * lead)
        return np.array([lean * a, right]) * np.sqrt(2 / (1 + lean ** 2))

    lead = read(port_lead, hz)
    person_lead = np.where(hz < housing_hz, -2 * np.pi * hz * port_delay, lead)
    spectra = pair(shell, np.where(hz < housing_hz, 0, lead), gain_of(read(balance, hz)))
    near = irfft(spectra, size)[:, :N]
    below_housing = np.fft.ifft(2 * spectra[1] * (hz < housing_hz), size)[:N]
    lag = np.exp(-1j * np.interp(TIME, *np.transpose(shell_lead)))
    near[1] += (below_housing * (lag - 1)).real  # the right port falls behind as the shell moves left
    around = irfft(pair(person, person_lead, 0.99) + pair(air, lead, 1), size)[:, :N]
    shift_db = np.interp(TIME, *np.transpose(shell_lean))
    return near * gain_of([shift_db / 2, -shift_db / 2]) + around


def scene():
    """Shell, boots, clothes and wind, all close and dry."""
    air = wind()
    person = nylon() + crunches() + tread()
    shell = chips() + knocks() + drag() + groan()
    return ports(shell, person, air)


def record(dry):
    """The loudest peaks are rounded off near full scale; then the band limit."""
    edge_hz = 15950
    rounded = dry / (1 + (dry / .95) ** 6) ** (1 / 6)
    low_pass = signal.firwin(401, edge_hz, window=("kaiser", 8), fs=SR)
    return signal.oaconvolve(rounded, low_pass[None], "same")


dry = scene()
out = record(dry)
persist_wave(out)
```